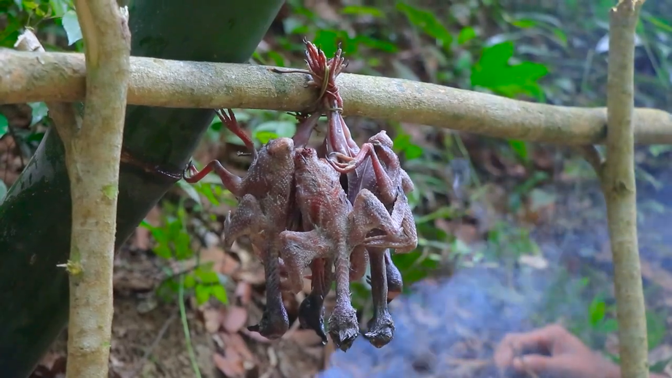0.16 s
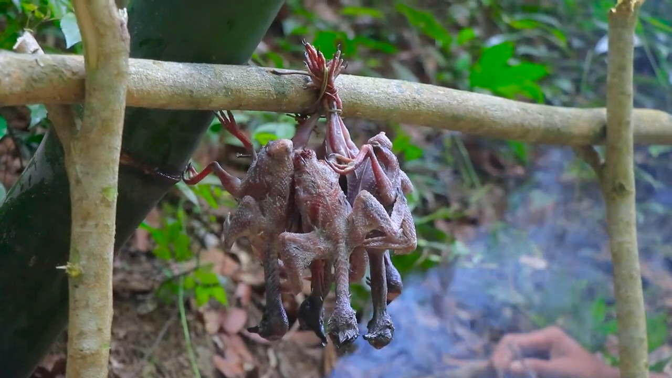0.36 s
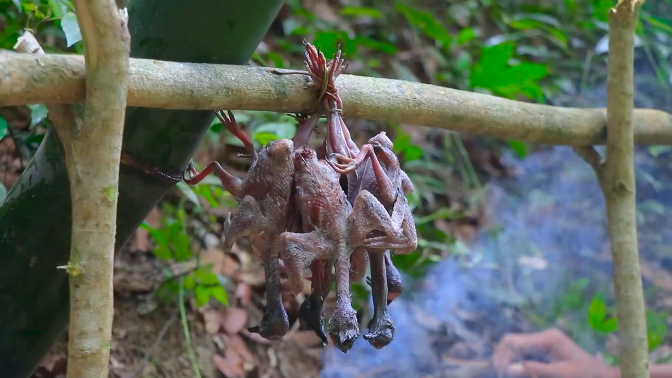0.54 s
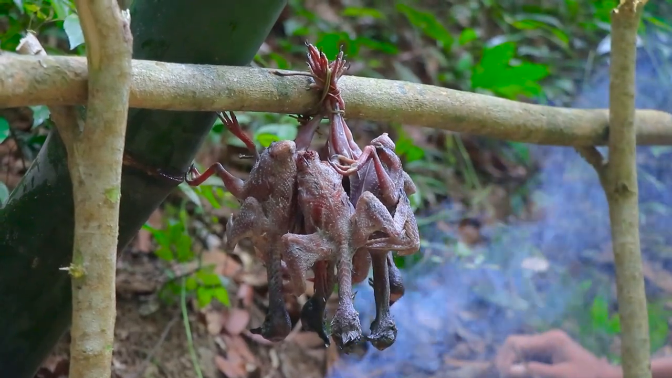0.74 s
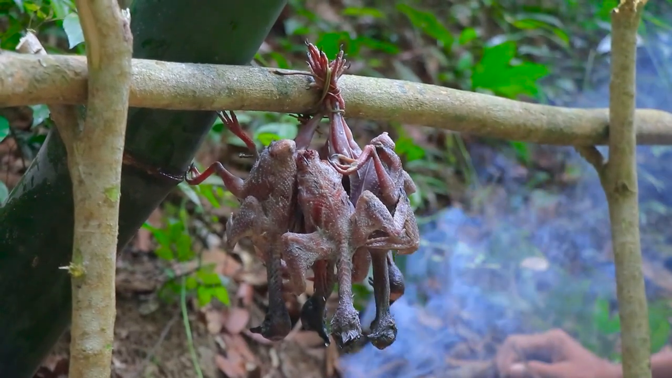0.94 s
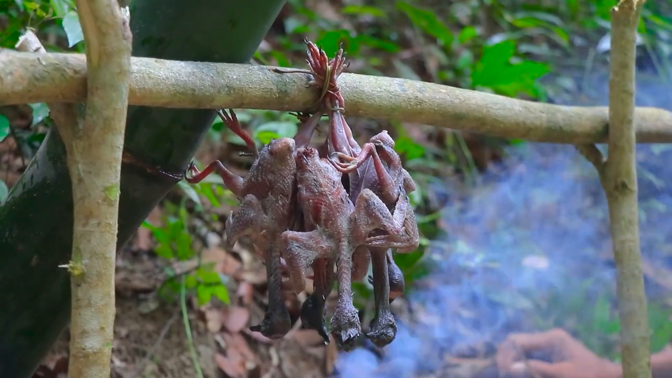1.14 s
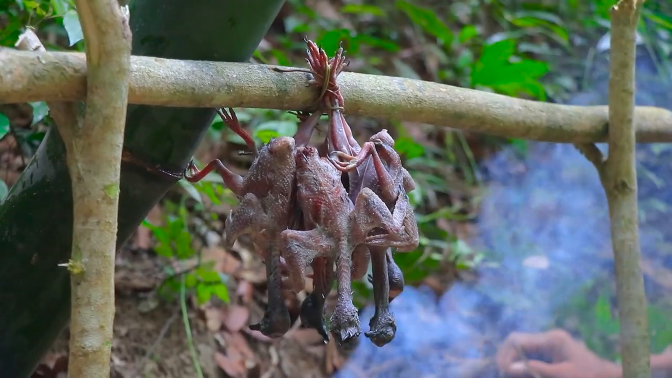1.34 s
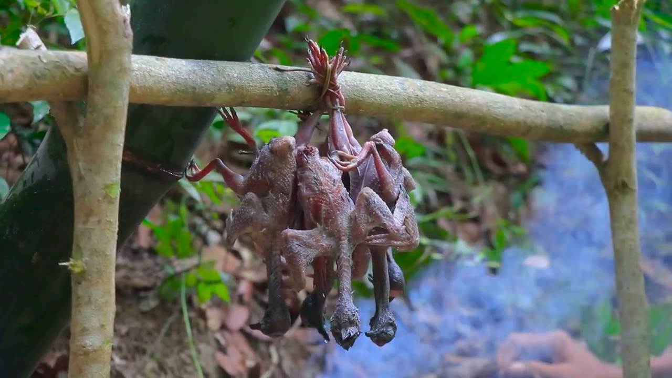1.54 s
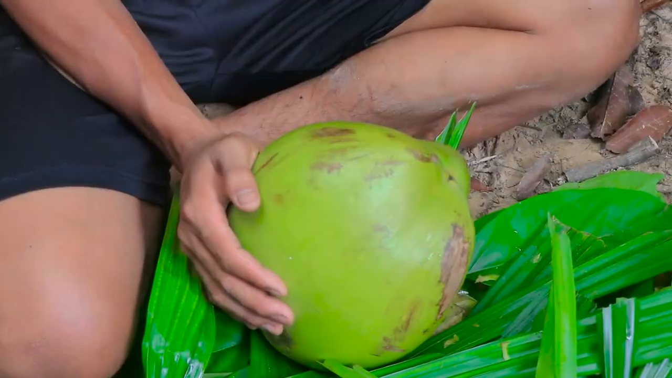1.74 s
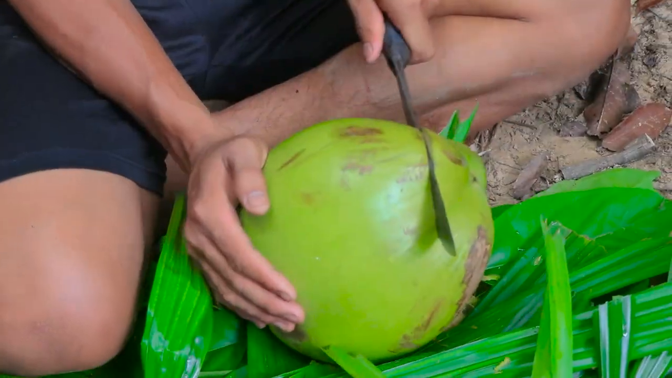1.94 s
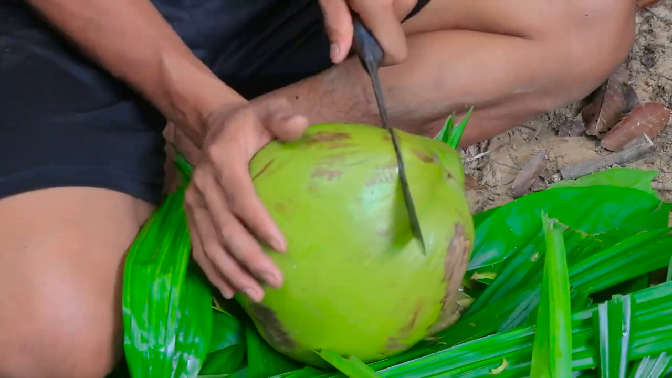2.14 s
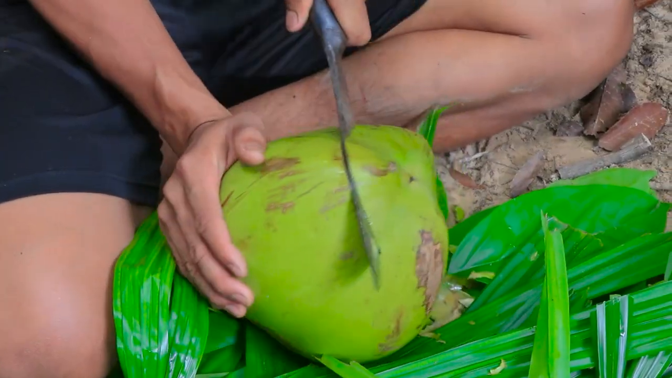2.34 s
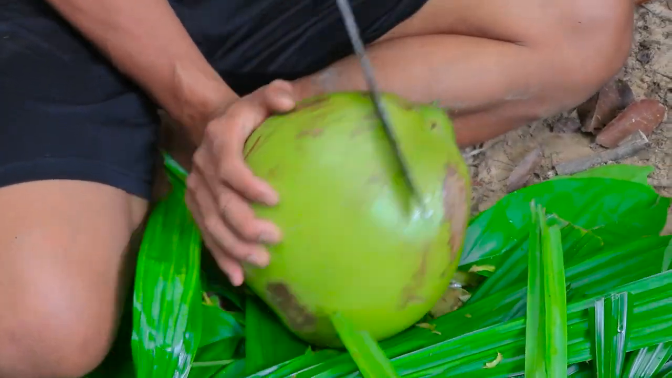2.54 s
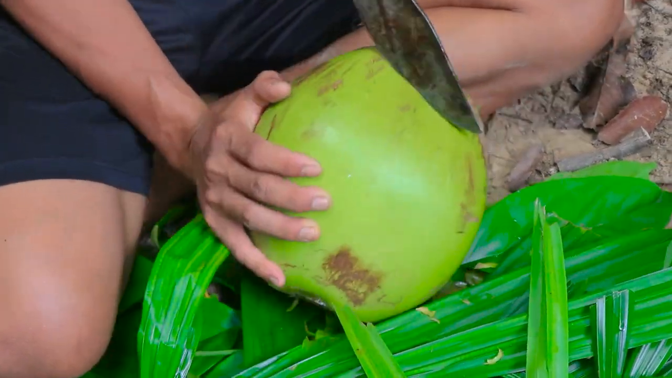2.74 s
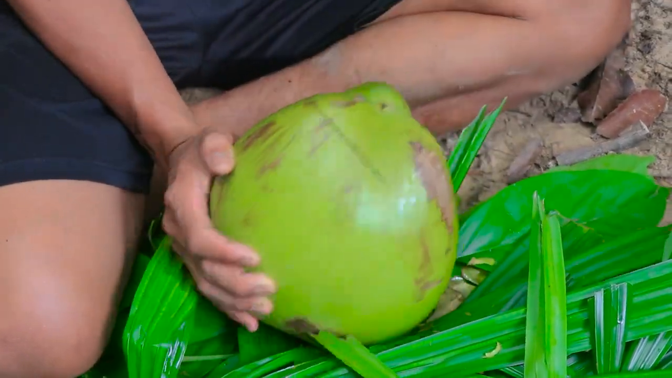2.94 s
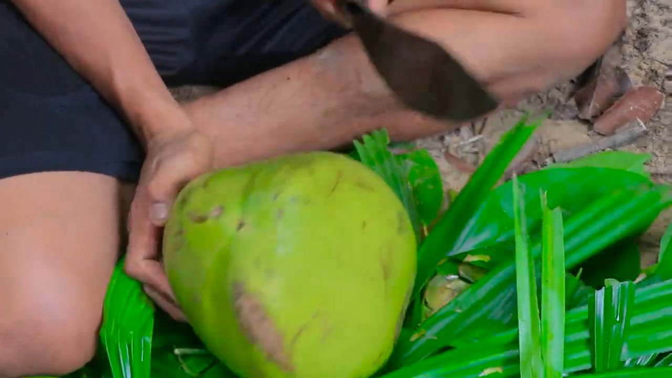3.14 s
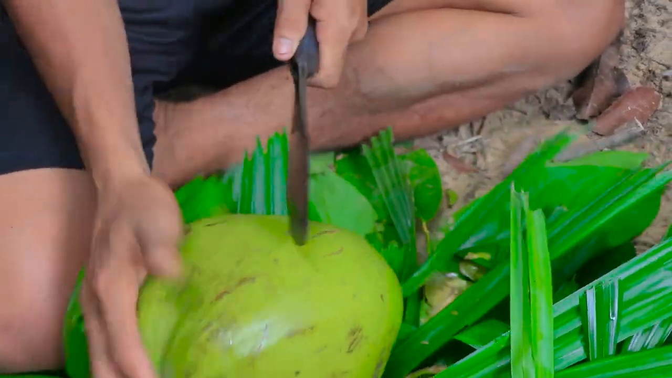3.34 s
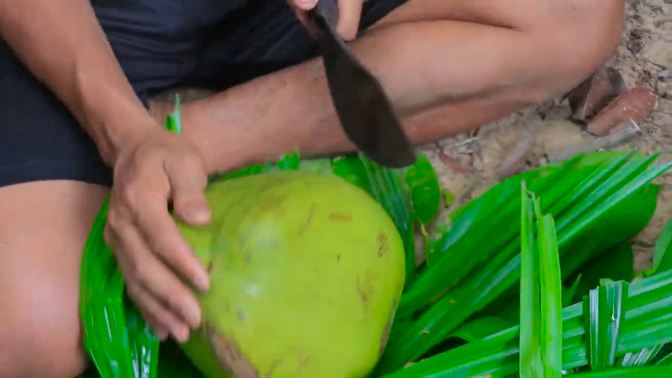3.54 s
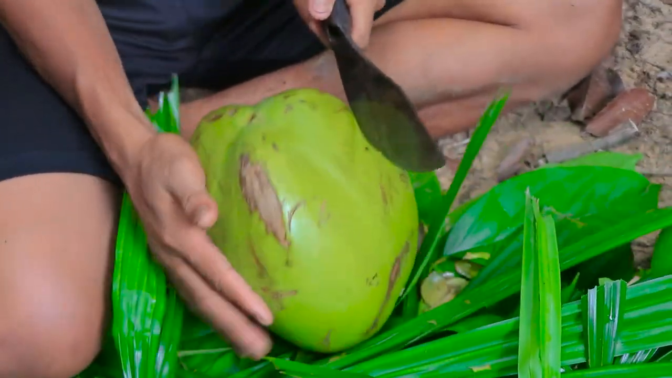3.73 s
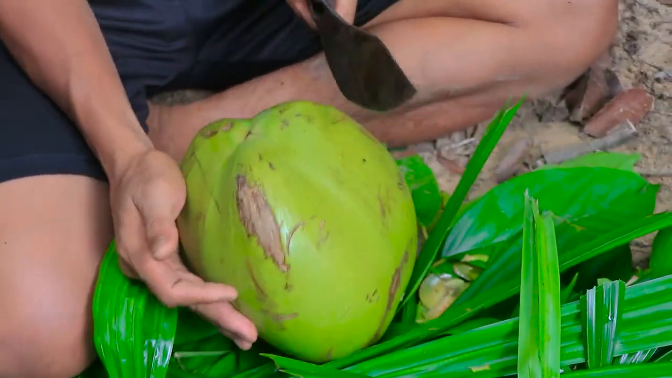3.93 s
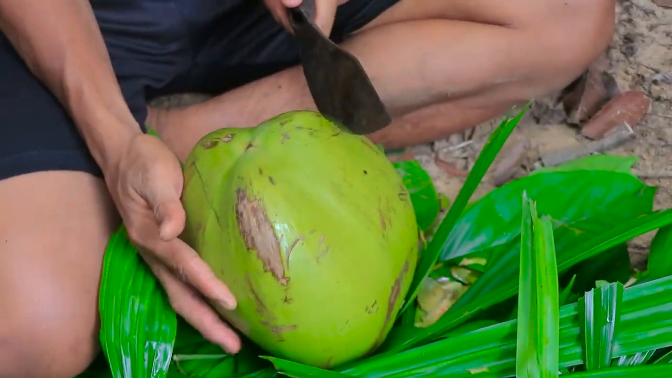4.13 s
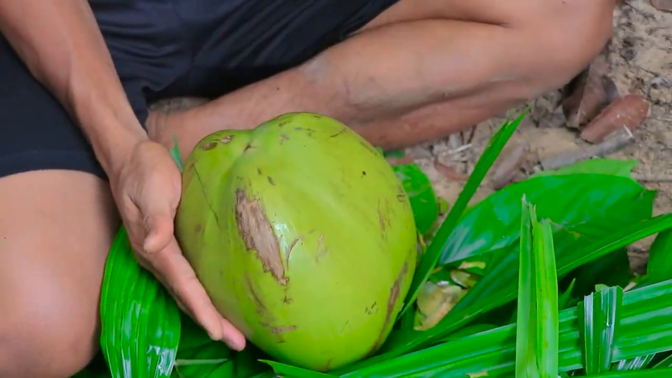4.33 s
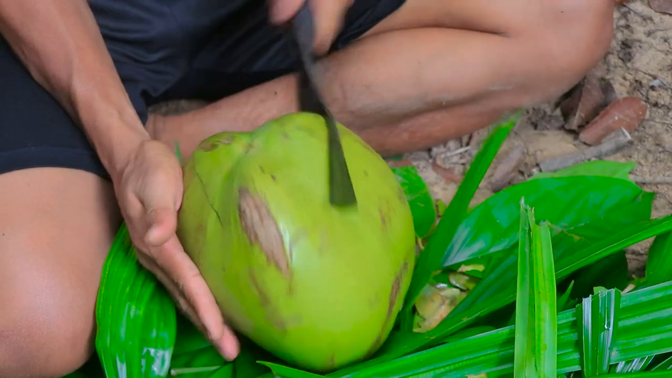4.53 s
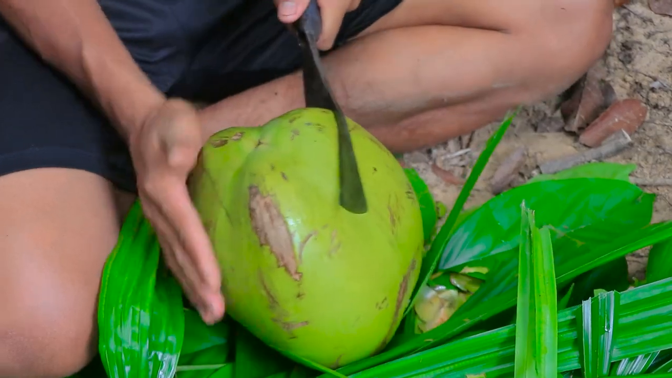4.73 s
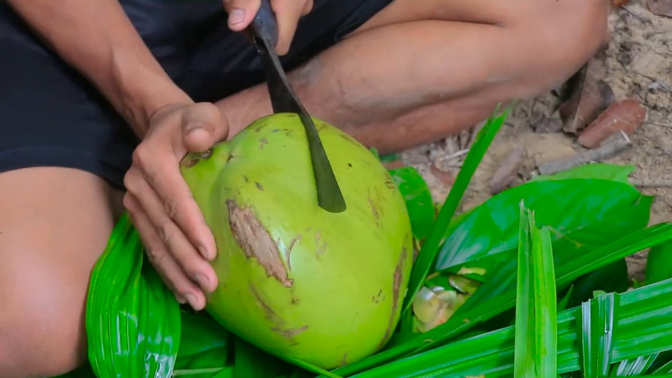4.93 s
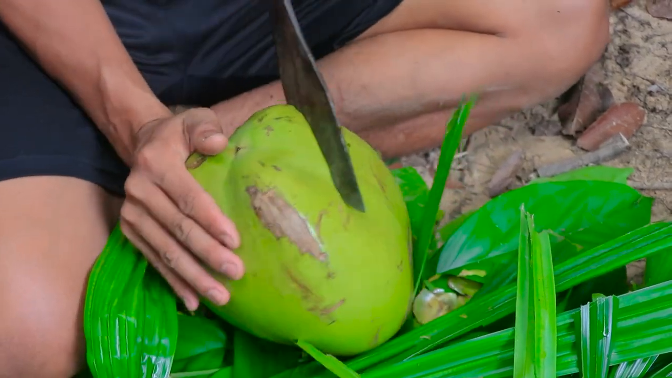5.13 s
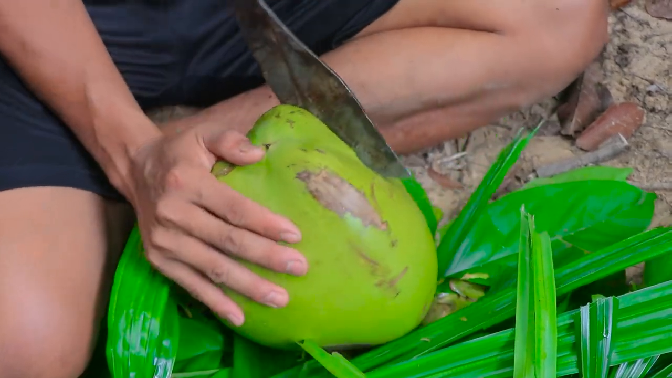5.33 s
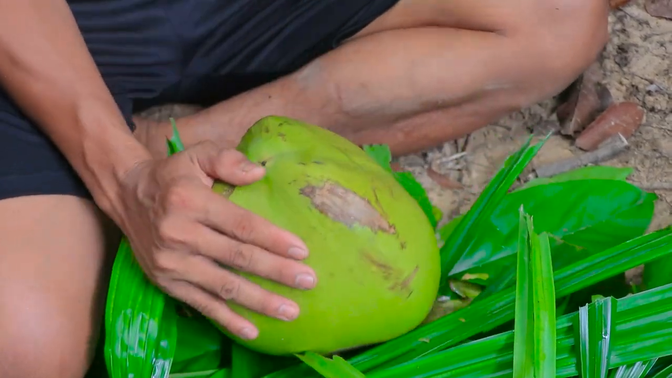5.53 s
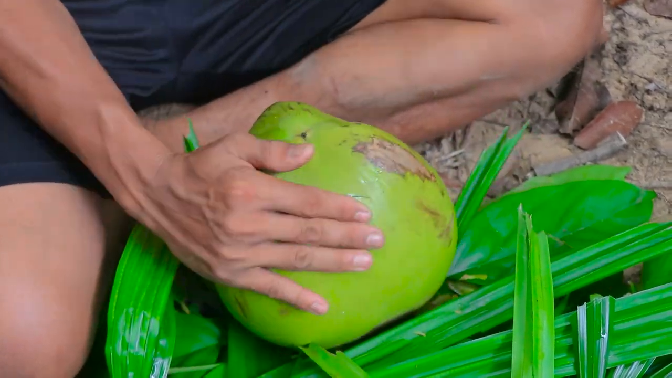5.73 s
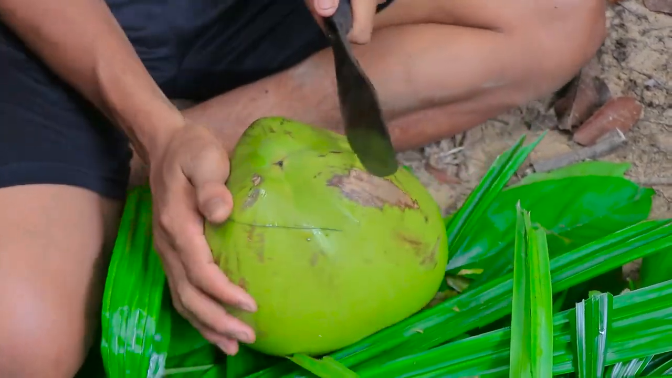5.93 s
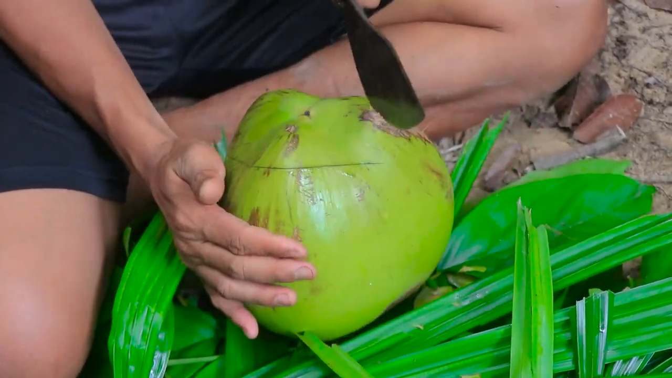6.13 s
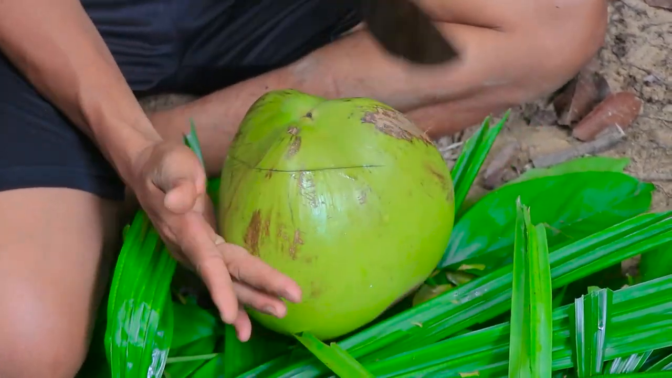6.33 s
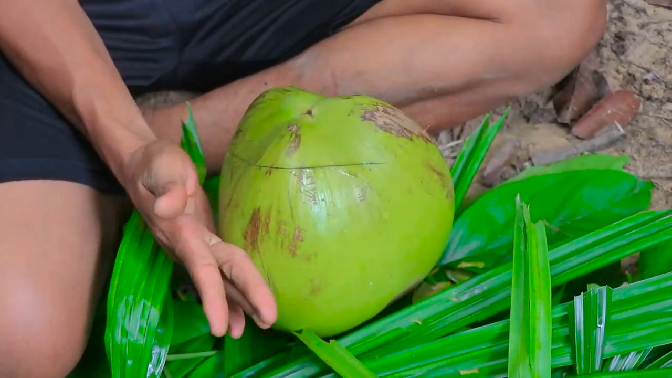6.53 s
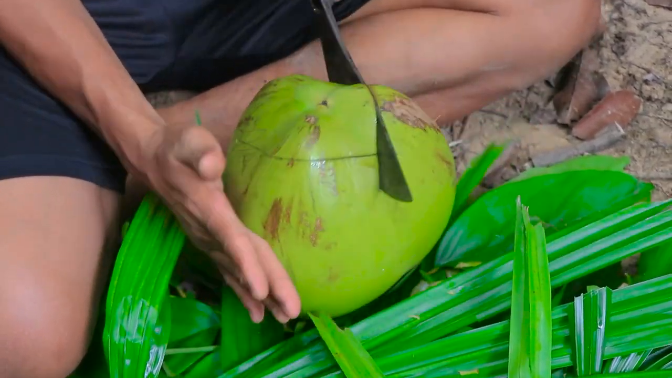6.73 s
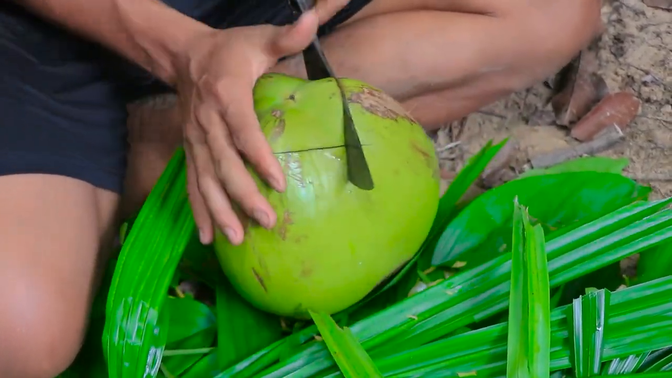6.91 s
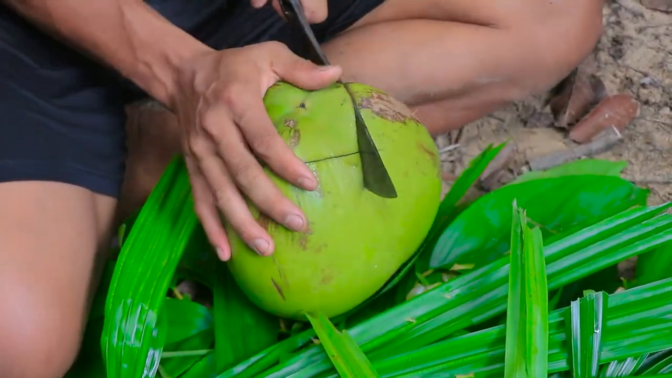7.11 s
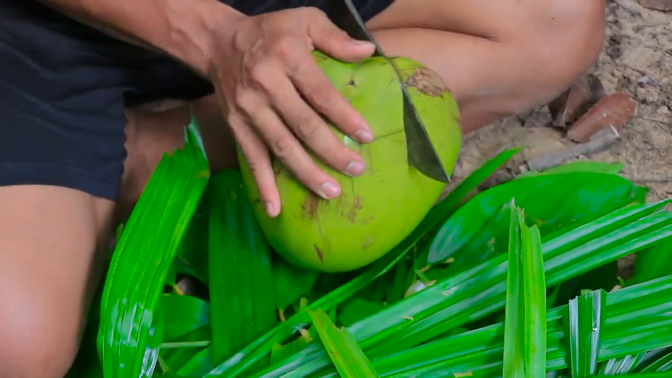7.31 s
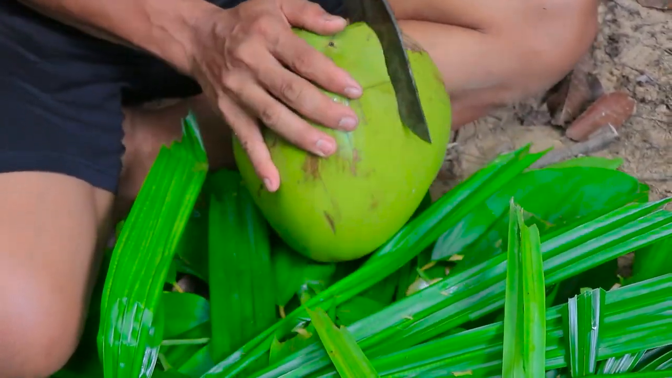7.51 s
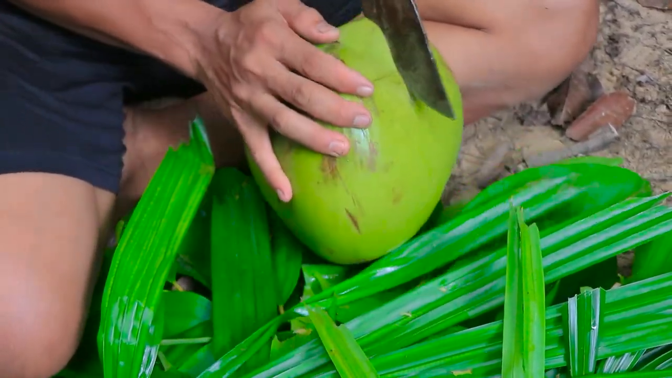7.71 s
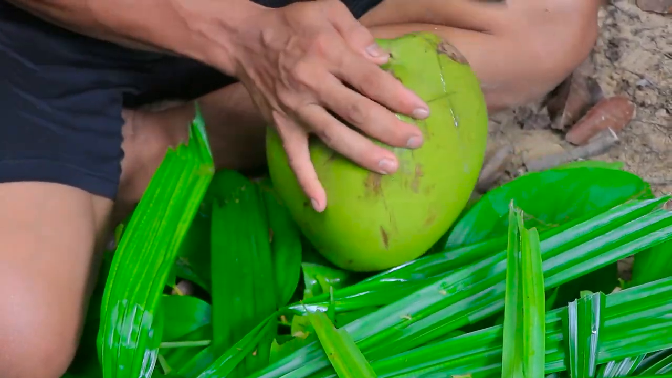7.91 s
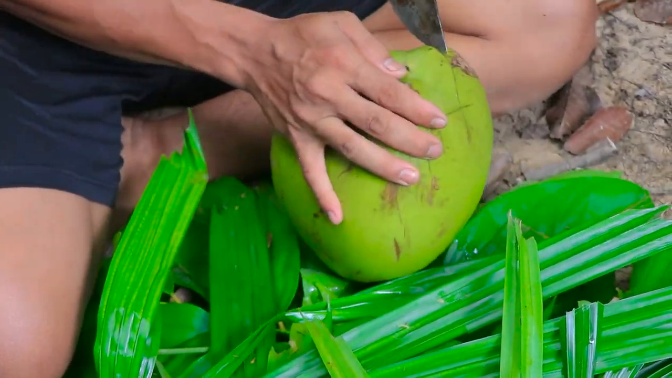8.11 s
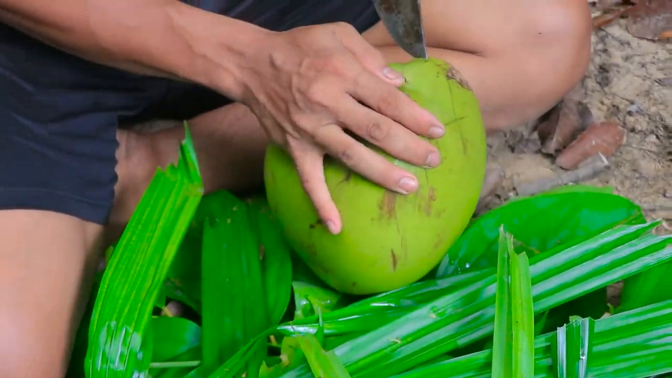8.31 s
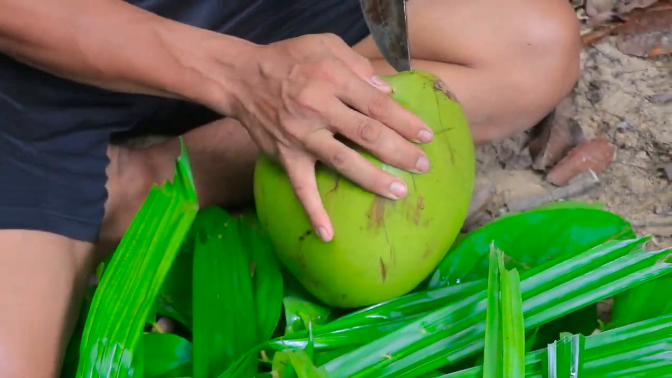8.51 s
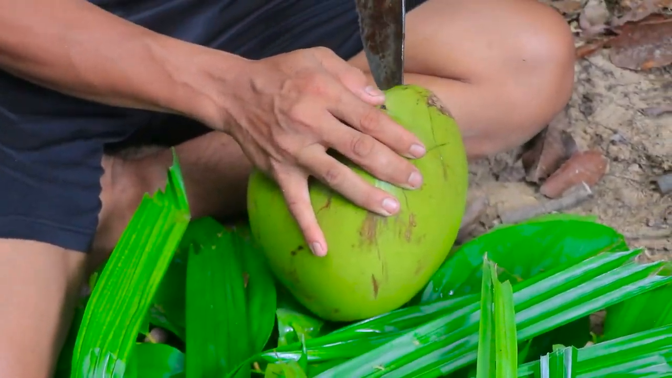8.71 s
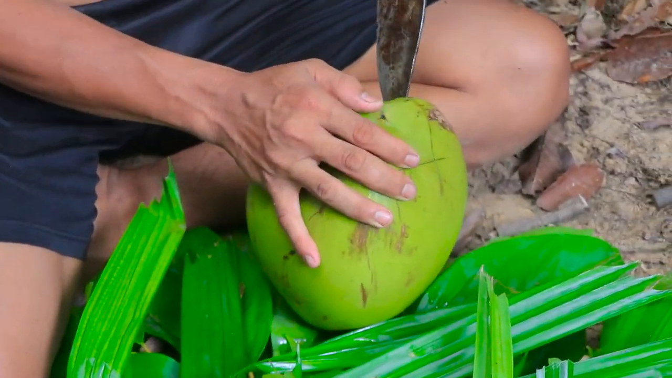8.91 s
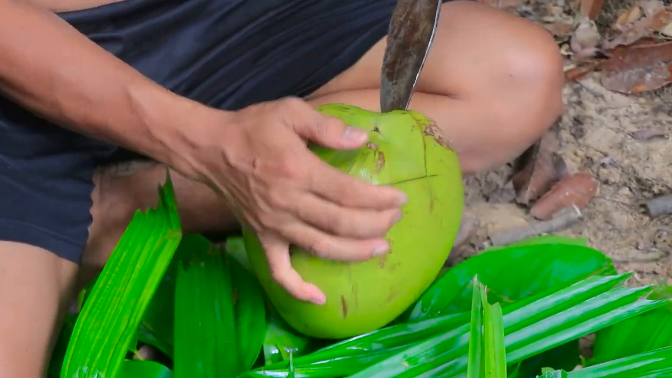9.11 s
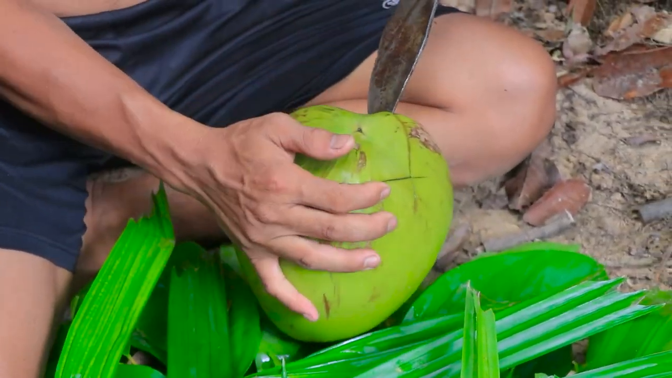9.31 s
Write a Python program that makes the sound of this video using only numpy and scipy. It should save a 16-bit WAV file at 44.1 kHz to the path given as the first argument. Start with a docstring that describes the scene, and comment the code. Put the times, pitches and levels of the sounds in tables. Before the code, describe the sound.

Close outdoor stereo pickup, little echo. First, soft leaf rustling, a single wooden tap and short pure bird notes over faint rumble and hiss. Then sharp clicks at right, and a knife chopping a water-filled coconut. Three loud fibrous cracks are spaced a few seconds apart, with gritty prying, brief squeaks, dull hollow knocks and leafy rustling as the nut is turned.

```python
"""Green coconut at a forest camp

Beside a smoking fire dry leaves rustle, wood taps once and a bird whistles over the forest's hum and hiss.
Then, on a bed of palm leaves, a long knife chops three times into a green coconut.
After each chop the blade is worked out of the wet husk, and the nut is rolled over on the leaves.
Contacts are noise bursts with decaying sines; friction is trains of random clicks, filtered and swelled.
"""
import sys
import numpy as np
from scipy import signal
from scipy.fft import rfft, irfft, next_fast_len
from scipy.io import wavfile

SR = 44100
rng = np.random.default_rng(int(sys.argv[2]) if len(sys.argv) > 2 else 0)


def store_pcm(level_fs):
    """Save levels as 16-bit WAV."""
    pcm = np.round(np.clip(level_fs, -1, 1) * 32767).astype(np.int16)
    wavfile.write(sys.argv[1], SR, np.atleast_2d(pcm).T)


N = 412776
T = np.arange(N) / SR

SCENE_CHANGE_S = 1.675  # the fireside gives way to the work on the nut
CAMP_AIR_DB, FOREST_AIR_DB = -46, -49.5
RESTING_DB = -60  # the held nut never lies quite still
CUTOFF_HZ = 15900
# Movements: rise before the start and 60 dB fall after the end, in seconds.
STROKE_ATTACK_S, STROKE_RELEASE_S = 0.012, 0.061
SHOVE_ATTACK_S, SHOVE_RELEASE_S = 0.041, 0.33
STIR_ATTACK_S, STIR_RELEASE_S = 0.046, 0.17
NOTE_ATTACK_S, NOTE_RELEASE_S, NOTE_GLIDE_S = 0.0123, 0.062, 0.0273

# Background air. Each row: frequency in Hz, relative level in dB.
CAMP_AIR_SPECTRUM = [(20, -24), (45, 3), (60, 2), (85, 0.5), (125, -5), (200, -9), (310, -12), (440, -10.5),
                     (890, -17.5), (2200, -23), (4200, -25.5), (6000, -34), (9000, -26.5), (13600, -17),
                     (16000, -20.5)]
FOREST_AIR_SPECTRUM = [(20, -6), (45, -4.5), (65, -3), (84, 0), (105, -8), (160, -8.5), (280, -11),
                       (440, -10), (750, -15), (1500, -16), (3800, -23), (5800, -30.5), (10500, -23.5),
                       (16000, -34)]
# A faint far hum at the camp. Each row: frequency in Hz, level in dB.
CAMP_HUM = [(99.8, -52), (150, -61.5)]

# Dry leaves stirred by the fire. Each row: start in seconds, length in seconds, crunch level in dB,
# swell over the movement in dB, crisp hiss relative to the crunch in dB.
LEAF_STIRS = [(0, 0.38, -59.5, -1, 0), (.31, 0.057, -38, 1, 3.5), (.41, 0.18, -53, -2, 3.5),
              (.6, 0.061, -49, 5, 4), (.69, 0.17, -55, -8, -1.5), (.865, 0.036, -42, 2.5, 0.5),
              (.93, 0.023, -47, -1, 1), (.992, 0.019, -44, -3, -2.5), (1.04, 0.39, -57, 1, 2)]
# Bird notes. Each row: start in seconds, length in seconds, start pitch in Hz, end pitch in Hz,
# level in dB, swell over the note in dB, throb depth from 0 to 1.
BIRD_NOTES = [(.005, 0.035, 985, 993, -36, -1, 0.02), (.165, .045, 1277, 1153, -38, -8, 0.32),
              (.215, 0.17, 1152, 1144, -45, -5, 0.35), (1.674, 0.051, 1166, 1125, -45, 2, 0.34)]
# Close clicks on the right. Each row: start in seconds, click level in dB, click centre in Hz,
# thud level in dB.
RIGHT_CLICKS = [(1.7401, -9, 1280, -7), (1.7543, -16, 1400, -32), (1.775, -14.5, 3800, -17),
                (1.782, -14, 550, -27), (1.79, -4.5, 11100, -22)]

# The nut shoved over the palm leaves. Each row: start in seconds, length in seconds, rubbing level in dB,
# swell over the movement in dB, shell relative to the rubbing in dB, leaf hiss relative to it in dB.
NUT_SHOVES = [(1.845, 0.061, -45, 7, -4, 3), (1.93, 0.25, -48.5, -11.5, 1, -2.5),
              (2.335, 0.072, -42, -0.5, -1.5, 0.5), (2.46, 0.049, -46, -1, -2.5, -12),
              (2.64, 0.14, -40.5, 1, -5, -4.5), (2.83, 0.093, -40.5, 4.5, -0.5, -6),
              (2.97, .18, -40, 6, -5, -3), (3.17, .19, -33.5, 6.5, -3.5, -4),
              (3.38, 0.12, -37.5, -5, -5, -3), (3.53, 0.28, -40, -2, 0.5, -2),
              (3.84, 0.2, -46.5, 8, -8, -2.5), (4.15, 0.0097, -47, -11, -5, 1.5),
              (4.52, 0.027, -53, 2, -10, -3), (4.63, 0.073, -44, -2, -5, -1.5),
              (4.815, 0.021, -49, 0, -12, -1.5), (5.25, 0.059, -48.5, 3, -11, -3),
              (5.33, 0.11, -45.5, -4, -18, 2), (5.5, 0.081, -51, 0, -3, -5),
              (5.69, 0.075, -47.5, -0.5, -13, 1), (5.905, 0.02, -42, 6, -5, -3),
              (6.04, 0.16, -49.5, 1.5, -5, -1), (6.37, 0.037, -54, 0, -8, 1),
              (6.71, 0.055, -45.5, 6, -3, -2), (6.91, .15, -50, -6, -7, -1.5),
              (7.19, 0.14, -42, 4.5, -8.5, -0.5), (7.44, 0.28, -45, -3, 1, -2),
              (7.83, 0.13, -43, 4, 0.5, 1), (8.0, 0.12, -45, -3, -1.5, -0.5),
              (8.18, 0.27, -48.5, -0.5, -4, 0), (8.5, 0.18, -55, 8, -8, -5), (8.92, 0.025, -55, -2, -12, 1),
              (9.05, 0.14, -51, 1.5, -5, -5.5), (9.2, 0.18, -49.5, -8, -3, -3.5)]
# Short ringing ticks: ribs and fibres snapping, and one wooden tap by the fire.
# Each row: start in seconds, level in dB, centre in Hz.
RINGING_TICKS = [(0.218, -35.5, 10500), (0.2618, -28, 1080), (.383, -30, 8100), (.905, -34, 4500),
                 (0.989, -37, 2470), (1.035, -35, 4000), (1.299, -37, 9000), (1.423, -35, 8500),
                 (2.124, -27, 1700), (2.561, -20, 1490), (2.899, -25.5, 1560), (2.873, -29, 1600),
                 (3.297, -22.5, 1600), (3.4067, -24, 2900), (3.437, -12, 3830), (3.784, -24.5, 2180),
                 (4.147, -36, 2560), (5.319, -24.5, 3870), (5.399, -34, 4000), (5.427, -25, 3120),
                 (5.639, -37, 2550), (6.176, -40.5, 4000), (6.754, -31, 3030), (6.984, -36, 4000),
                 (7.409, -18, 2640), (7.784, -38, 3260), (7.930, -35, 3040), (8.071, -30.5, 3320),
                 (8.281, -24, 2880), (8.561, -31, 1820)]
# Dull knocks on the nut. Each row: start in seconds, clack level in dB, clack pitch in Hz,
# thump level in dB, shell pitch in Hz, time the shell is driven in seconds.
NUT_KNOCKS = [(1.888, -17, 900, -16, 394, 0.025), (2.231, -31.5, 1440, -28.5, 343, 0.0054),
              (2.246, -48, 1310, -28.5, 215, 0.0085), (2.277, -28, 1370, -37, 302, 0.015),
              (3.168, -30, 1370, -29.5, 456, 0.017), (3.318, -47, 1300, -22, 440, .006),
              (3.342, -25, 1480, -24, 354, 0.0053), (3.438, -23.5, 1505, -22, 475, 0.0016),
              (3.479, -49, 1400, -31, 420, 0.004), (3.592, -19.5, 1095, -32, 434, 0.016),
              (3.6397, -28, 880, -24.5, 440, 0.0032), (3.683, -24, 1040, -27, 450, 0.017),
              (3.720, -37, 895, -31.5, 450, 0.016), (3.759, -38, 1230, -32, 396, 0.014),
              (4.03, -35, 780, -27.5, 402, 0.0081), (4.034, -48, 760, -35.5, 251, 0.019),
              (5.905, -42, 1500, -37, 367, 0.0036), (5.932, -31, 1316, -43, 420, 0.0036),
              (6.205, -57, 1490, -35, 334, 0.0033), (7.391, -28.5, 1430, -34, 375, 0.01),
              (7.419, -23, 950, -28, 365, 0.031), (8.179, -37, 1400, -38, 392, 0.012)]
# The blade levered through the husk. Each row: start in seconds, length in seconds, husk level in dB,
# swell over the stroke in dB, shell relative to the husk in dB, fibres relative to it in dB.
BLADE_STROKES = [(2.236, 0.039, -45.5, 3, 6, -1.5), (2.278, 0.032, -44.5, -5.5, 6, 4),
                 (2.502, 0.07, -31.5, -7, -10, 1.5), (2.577, 0.079, -42, -9.5, -4.5, 5),
                 (2.79, 0.025, -30.5, 8, -1.5, 3), (5.031, .013, -30, -3, -1.5, -1.5),
                 (5.058, 0.11, -29.5, 5, -9, 2.5), (5.172, 0.04, -31.5, 1.5, -11, 0.5),
                 (5.463, 0.03, -30.5, -4, -8.5, 5), (7.39, 0.036, -32.5, 4, -3, -3.5),
                 (7.432, 0.084, -37.5, -1, -3.5, 2), (7.53, 0.029, -33, 4, -13, 2),
                 (7.566, 0.12, -40.5, -1, -10, 4), (7.749, 0.017, -31.5, -1.5, -13, -5),
                 (7.786, 0.0082, -41, 1, -7, 16.5)]
# The blade squeaking in the husk. Each row: start in seconds, length in seconds, start pitch in Hz,
# end pitch in Hz, level in dB.
BLADE_SQUEAKS = [(2.486, 0.027, 537, 1340, -32), (2.751, 0.049, 1425, 1263, -34.5),
                 (2.796, 0.028, 1120, 1370, -41), (5.147, 0.022, 1347, 1416, -24.5),
                 (5.454, 0.014, 1310, 1700, -25.5), (5.466, 0.019, 1530, 1700, -23),
                 (7.534, 0.038, 483, 499, -29.5), (7.666, 0.019, 1010, 900, -33.5),
                 (7.745, 0.023, 1570, 1560, -38)]
# Strength of a squeak's partials. Each row: frequency in Hz, relative level in dB.
SQUEAK_SPECTRUM = [(450, 5), (750, 6), (1000, -2), (1500, 3.5), (2000, -6), (2700, -5), (3300, -5.5),
                   (4200, -18), (5500, -12), (7000, -17), (14000, -22)]
# The blade slipping free and ringing. Each row: start in seconds, level in dB.
BLADE_RELEASES = [(2.82, -44), (5.497, -42)]
# Ringing modes of the blade. Each row: frequency in Hz, relative level in dB, 60 dB decay in seconds.
BLADE_MODES = [(2630, -6, .15), (3400, 4.5, .2), (10900, 6, 0.08), (13600, -4, .15)]
# Chops. Each row: start in seconds, crack level in dB, cutting time in seconds, thump level in dB,
# thump delay in seconds, shell pitch in Hz, time the shell is driven in seconds.
KNIFE_CHOPS = [(1.912, -11.5, 0.004, -6.5, 0.0057, 414, 0.0024),
               (4.5981, -10.5, 0.0025, -24.5, 0.00545, 370, 0.011),
               (6.6780, -9, 0.0011, -9.5, 0.00494, 420, 0.0048)]
# Resonances of the husk round the blade. Each row: frequency in Hz, width in Hz, relative level in dB.
HUSK_MODES = [(964, 280, -7.5), (1433, 140, 10.5), (1590, 410, -4), (2084, 40, 2)]

# Spectra of the nut, husk and leaves. Each row: frequency in Hz, relative level in dB.
SHELL_SPECTRUM = [(120, -20.5), (250, -10), (340, -5), (440, 2), (540, -3.5), (700, -7), (1000, -12),
                  (1600, -82)]
FIBRE_SPECTRUM = [(700, -36), (1600, -2), (2400, 3.5), (3400, 1), (4800, -3.5), (5900, -9.5), (7500, -5.5),
                  (9000, -4.5), (12000, -7.5), (14000, -12), (16000, -26)]
RUB_SPECTRUM = [(400, -14), (800, -42.5), (1100, -4), (1480, 3.5), (1900, 0), (2600, 0), (3400, 1),
                (4700, -2.5), (5800, -11), (8000, -68)]
LEAF_HISS_SPECTRUM = [(3000, -20), (5700, -6), (7500, 1), (9000, 2.5), (11000, 3.5), (13500, -2.5),
                      (16000, -10.5)]
CRACK_SPECTRUM = [(150, -47), (300, -39), (450, -13), (600, 7), (950, 2), (1430, 1.5), (2000, -0.5),
                  (3300, 1), (4500, -4), (5700, -9), (7200, -6.5), (10000, -3), (13000, -7.5), (16000, -15)]

# Likeness of left and right for close work, leaves and air. Each row: frequency in Hz, likeness from 0 to 1.
NEAR_LIKENESS = [(400, 0.98), (1400, 0.88), (3200, 0.62), (6000, 0.62), (12000, 0.4)]
LEAFY_LIKENESS = [(400, 0.99), (1400, 0.8), (3200, 0.38), (6000, 0.033), (12000, 0.081)]
DIFFUSE_LIKENESS = [(60, 0.98), (150, 0.77), (450, 0.31), (1400, 0.055), (4000, 0.017), (12000, .02)]
# Stereo lean of the coloured textures. Each row: frequency in Hz, left minus right in dB.
STEREO_LEAN = [(100, -.5), (450, -0.1), (1400, -1.5), (3200, -2.5), (6000, -3.5), (11000, -4)]


def from_db(db):
    """Decibels to gain."""
    return 10 ** (np.asarray(db) / 20)


def rms_one(x):
    """Scale so that the centre of the stereo image has rms 1."""
    centre = np.atleast_2d(x).mean(axis=0)
    return x / np.sqrt(np.mean(centre ** 2) + 1e-20)


def at_hz(points, hz):
    """Read a table on a log-frequency axis."""
    table_hz, value = np.transpose(points)
    return np.interp(np.log(hz + 1e-9), np.log(table_hz), value)


def add(out, start_s, sound):
    """Mix a short sound in at its start time."""
    at = int(start_s * SR)
    out[..., at:at + sound.shape[-1]] += sound[..., :N - at]


def sine(hz, t):
    """A steady sine starting at phase zero."""
    return np.sin(2 * np.pi * hz * t)


def flutter(rate, depth_db):
    """A gain that wanders at random between new values, rate times a second."""
    knots = rng.standard_normal(N // 20)
    return from_db(depth_db * np.interp(T * rate, np.arange(len(knots)), knots))


def grains(per_s, spread_db):
    """Two trains of random clicks, a few of them much larger than the rest."""
    sizes = from_db(spread_db * np.minimum(rng.exponential(1, (2, N)), 4.5))
    signs = rng.choice([-1, 1], (2, N))
    fires = rng.random((2, N)) < per_s / SR
    return sizes * signs * fires


def colour(pair, spectrum, likeness):
    """Turn two unrelated signals into a stereo texture with this spectrum; rms 1."""
    length = pair.shape[-1]
    size = next_fast_len(length, real=True)
    hz = np.arange(size // 2 + 1) * SR / size
    mid, side = rfft(pair, size) * from_db(at_hz(spectrum, hz))
    alike = np.clip(at_hz(likeness, hz), 0, 1)
    signs = np.array([[1], [-1]])  # left, right
    both = np.sqrt(1 + alike) * mid + np.sqrt(1 - alike) * side * signs
    both = both * from_db(signs * at_hz(STEREO_LEAN, hz) / 2)
    return rms_one(irfft(both, size)[:, :length])


def resonate(x, hz, width_hz):
    """One resonance with gain 1 on top."""
    r = np.exp(-np.pi * width_hz / SR)
    zeros = np.array([1, 0, -1]) * (1 - r * r) / 2
    poles = [1, -2 * r * np.cos(2 * np.pi * hz / SR), r * r]
    return signal.lfilter(zeros, poles, x)


def burst(t, hold_s, t60):
    """An envelope that stays up for hold_s, then falls 60 dB in t60 seconds."""
    return from_db(-60 * np.maximum(t - hold_s, 0) / t60)


def gesture(start_s, length_s, swell_db, attack_s, release_s):
    """One movement: it rises up to its start, swells or sags evenly, then falls 60 dB in release_s."""
    out = np.zeros(N)
    first = max(int((start_s - attack_s) * SR), 0)
    span = slice(first, int((start_s + length_s + release_s) * SR))
    t = T[span] - start_s
    rise = np.clip(1 + t / attack_s, 0, 1)
    swell = from_db(swell_db * (np.clip(t / length_s, 0, 1) - 0.5))
    out[span] = rise * swell * burst(t, length_s, release_s)
    return out


def movements(rows, attack_s, release_s):
    """One gain curve for each layer of a movement table; where movements overlap the louder one wins."""
    out = np.zeros((len(rows[0]) - 3, N))
    for start_s, length_s, db, swell_db, *layers_db in rows:
        level = gesture(start_s, length_s, swell_db, attack_s, release_s)
        on = np.flatnonzero(level)
        layer_gains = from_db(db + np.array([0, *layers_db]))
        out[:, on] = np.maximum(out[:, on], np.outer(layer_gains, level[on]))
    return out


def air(drone_hz=83, drone_width_hz=7, drone_db=-58):
    """Shaped noise for far rumble and high hiss, with a hum by the fire and a low drone after it."""
    at_fire = np.clip((SCENE_CHANGE_S - T) / 0.02 + 0.5, 0, 1)  # 20 ms crossfade
    camp_noise = rng.standard_normal((2, N))
    camp = from_db(CAMP_AIR_DB) * colour(camp_noise, CAMP_AIR_SPECTRUM, DIFFUSE_LIKENESS)
    hum = sum(np.sqrt(2) * from_db(db) * sine(hz, T) for hz, db in CAMP_HUM)
    hum = hum * flutter(rate=5.1, depth_db=-1.0)
    forest_noise = rng.standard_normal((2, N))
    forest = from_db(FOREST_AIR_DB) * colour(forest_noise, FOREST_AIR_SPECTRUM, DIFFUSE_LIKENESS)
    drone = from_db(drone_db) * rms_one(resonate(rng.standard_normal(N), drone_hz, drone_width_hz))
    return np.sqrt(at_fire) * (camp + hum) + np.sqrt(1 - at_fire) * (forest + drone)


def dry_leaves(pan_db=-0.5):
    """Stirred leaf litter breaks in dense random clicks: a crunch and a crisp hiss, a touch to the right."""
    crunch_gain, hiss_gain = movements(LEAF_STIRS, STIR_ATTACK_S, STIR_RELEASE_S)
    crackle = grains(per_s=6000, spread_db=3.0) * flutter(rate=100, depth_db=2.5)
    crunch = colour(crackle, RUB_SPECTRUM, DIFFUSE_LIKENESS)
    crunch = crunch + from_db(-6) * colour(crackle, SHELL_SPECTRUM, LEAFY_LIKENESS)  # adds low body
    hiss = colour(crackle, LEAF_HISS_SPECTRUM, DIFFUSE_LIKENESS)
    return (crunch_gain * crunch + hiss_gain * hiss) * from_db([[pan_db / 2], [-pan_db / 2]])


def bird(overtone_db=-27, throb_hz=55, waver_db=1.4):
    """Nearly pure whistles with a faint octave; each settles on its end pitch, throbbing and wavering."""
    out = np.zeros(N)
    waver = flutter(rate=200, depth_db=waver_db) - 1
    for start_s, length_s, start_hz, end_hz, db, swell_db, depth in BIRD_NOTES:
        since_onset = np.maximum(T - start_s + NOTE_ATTACK_S, 0)
        hz = end_hz + (start_hz - end_hz) * np.exp(-since_onset / NOTE_GLIDE_S)
        phase = 2 * np.pi * np.cumsum(hz * (1 + depth * waver)) / SR
        throb = 1 + depth * np.cos(2 * np.pi * throb_hz * (T - start_s))
        note = gesture(start_s, length_s, swell_db, NOTE_ATTACK_S, NOTE_RELEASE_S)
        whistle = np.sin(phase) + from_db(overtone_db) * np.sin(2 * phase)
        out += np.sqrt(2) * from_db(db) * note * throb * whistle
    return out * from_db([[-1], [0.8]])


def right_clicks(width_share=0.71, click_t60=0.0076, thud_hz=125, thud_t60=0.012):
    """Short resonant noise clicks, each with a low decaying thud, almost wholly on the right."""
    out, t = np.zeros(N), T[:SR // 10]
    for start_s, click_db, click_hz, thud_db in RIGHT_CLICKS:
        click = rms_one(resonate(rng.standard_normal(len(t)), click_hz, width_share * click_hz))
        thud = -np.cos(2 * np.pi * thud_hz * t) * burst(t, 0, thud_t60)
        add(out, start_s, from_db(click_db) * click * burst(t, 0, click_t60))
        add(out, start_s, from_db(thud_db) * thud)
    return out * from_db([[-30], [0]])


def crackles(per_s=110, spread_db=3.5, low_hz=900, high_hz=11000, width_share=0.14, count=12):
    """Loose snaps of leaf ribs, dealt at random to resonances from low to high; rms 1."""
    clicks = grains(per_s, spread_db)
    dealt = rng.integers(0, count, N)
    ticks = np.zeros((2, N))
    for k, hz in enumerate(np.geomspace(low_hz, high_hz, count)):
        ticks += resonate(clicks * (dealt == k) + 1e-18, hz, width_share * hz) / np.sqrt(hz)
    return rms_one(ticks + 0.5 * ticks[::-1])  # half of each side leaks to the other


def rolling(crackle_db=-7):
    """The smooth skin rubs over the leaves, which crackle and hiss; the hollow nut rumbles along."""
    resting = from_db(RESTING_DB) * (T > SCENE_CHANGE_S)
    gains = np.maximum(movements(NUT_SHOVES, SHOVE_ATTACK_S, SHOVE_RELEASE_S), resting)
    rub_gain, shell_gain, hiss_gain = gains
    friction = grains(per_s=6000, spread_db=3.0) * flutter(rate=110, depth_db=2.2)
    rub = from_db(-0.42) * colour(friction, RUB_SPECTRUM, LEAFY_LIKENESS) * flutter(rate=54, depth_db=1.35)
    rub = rub + from_db(crackle_db) * crackles()
    rumble = from_db(-1.25) * colour(friction, SHELL_SPECTRUM, LEAFY_LIKENESS)
    rumble = rumble * flutter(rate=40, depth_db=2.5)
    brushing = grains(per_s=12000, spread_db=2.6) * flutter(rate=110, depth_db=2.7)
    hiss = from_db(-0.86) * colour(brushing, LEAF_HISS_SPECTRUM, LEAFY_LIKENESS)
    return shell_gain * rumble + rub_gain * rub + hiss_gain * hiss


def splinter(size=4096):
    """A short stretch of noise with the colour of breaking fibres."""
    return colour(rng.standard_normal((2, size)), CRACK_SPECTRUM, NEAR_LIKENESS)


def ringing_ticks(width_share=1.0, hold_s=0.000093, t60=0.014, ring_db=-4, ring_t60=0.023):
    """Ribs and fibres giving way, and one wooden tap: a resonant noise tick that rings for a moment."""
    out = np.zeros((2, N))
    for start_s, db, hz in RINGING_TICKS:
        tick = rms_one(resonate(splinter(), hz, width_share * hz))
        t = T[:tick.shape[1]]
        ring = from_db(ring_db) * sine(hz, t) * burst(t, 0, ring_t60)
        add(out, start_s, from_db(db) * (tick * burst(t, hold_s, t60) + ring))
    return out


def thump(hz, hold_s, t60=0.016, slosh_db=-26, slosh_t60=0.094, rise_s=0.002, low_cut_hz=220):
    """The water-filled shell swings while pushed, then faintly rings on; it is too small to radiate bass."""
    t = T[:SR // 6]
    swing = burst(t, hold_s, t60) + from_db(slosh_db) * burst(t, hold_s, slosh_t60)
    level = np.minimum(t / rise_s, 1) * swing
    low_cut = signal.butter(2, low_cut_hz, "high", fs=SR, output="sos")
    return signal.sosfilt(low_cut, -sine(hz, t) * level)


def knocks(clack_width_hz=600, clack_s=0.0008, clack_t60=0.011, ring_db=-1, ring_t60=0.038, judder_db=-11):
    """Soft contacts of blade, hand and ground: the husk clacks and judders over the shell's thump."""
    out = np.zeros((2, N))
    for start_s, clack_db, clack_hz, thump_db, shell_hz, hold_s in NUT_KNOCKS:
        rasp = rms_one(resonate(splinter(), clack_hz, clack_width_hz))
        t = T[:rasp.shape[1]]
        judder = from_db(judder_db) * burst(t, hold_s, clack_t60)
        contact = from_db(-1.5) * burst(t, clack_s, clack_t60) + judder
        ring = from_db(ring_db) * sine(clack_hz, t) * burst(t, clack_s, ring_t60)
        add(out, start_s, from_db(clack_db) * (rasp * contact + ring))
        add(out, start_s, from_db(thump_db) * thump(shell_hz, hold_s))
    return out


def squeaks(jitter_db=0.25, shimmer_db=1.5):
    """Now and then the slips lock into a pitch; returns that sound and how far they are locked, 0-1."""
    out, locked = np.zeros(N), np.zeros(N)
    jitter, shimmer = flutter(rate=340, depth_db=jitter_db), flutter(rate=210, depth_db=shimmer_db)
    for start_s, length_s, start_hz, end_hz, db in BLADE_SQUEAKS:
        span = slice(int(start_s * SR), int((start_s + length_s) * SR))
        hz = np.geomspace(start_hz, end_hz, len(T[span])) * jitter[span]
        partials_hz = np.outer(np.arange(1, 11), hz)
        phases = 2 * np.pi * np.cumsum(partials_hz, axis=1) / SR
        tone = np.sum(from_db(at_hz(SQUEAK_SPECTRUM, partials_hz)) * np.sin(phases), axis=0)
        window = signal.windows.tukey(len(hz), 0.5)
        add(out, start_s, from_db(db) * rms_one(tone) * window * shimmer[span])
        add(locked, start_s, window)
    return out * from_db([[-1.3], [1.2]]), np.minimum(locked, 1)


def blade_ring():
    """The freed blade rings in a few decaying steel modes."""
    out, t = np.zeros((2, N)), T[:SR // 3]
    for start_s, db in BLADE_RELEASES:
        add(out, start_s, sum(from_db(db + mode_db) * sine(hz, t) * burst(t, 0, t60)
                              for hz, mode_db, t60 in BLADE_MODES))
    return out


def blade_strokes():
    """Steel sticks and slips in the wet husk; the slips sound the shell, the husk and the torn fibres."""
    slips = grains(per_s=5000, spread_db=1.5) * flutter(rate=260, depth_db=2.0)
    shell = colour(slips, SHELL_SPECTRUM, NEAR_LIKENESS)
    fibres = colour(slips, FIBRE_SPECTRUM, NEAR_LIKENESS)
    drag = colour(slips, CRACK_SPECTRUM, NEAR_LIKENESS)
    husk = rms_one(sum((-1) ** k * from_db(db) * resonate(drag, hz, width_hz)
                       for k, (hz, width_hz, db) in enumerate(HUSK_MODES)))
    husk_gain, shell_gain, fibre_gain = movements(BLADE_STROKES, STROKE_ATTACK_S, STROKE_RELEASE_S)
    squeal, locked = squeaks()
    # the rough scraping gives way while a squeak holds
    body = (shell_gain * shell + husk_gain * husk) * from_db(-6 * locked)
    tearing = fibre_gain * fibres * from_db(-3 * locked)
    return squeal + body + tearing + blade_ring()


def chops(crack_t60=0.024, edge_db=-1.0, edge_t60=0.0083, husk_db=-9, husk_t60=0.027):
    """The edge bursts through skin and fibres, the husk rings, the nut thumps as the blade is stopped."""
    out = np.zeros((2, N))
    for start_s, crack_db, cut_s, thump_db, delay_s, shell_hz, hold_s in KNIFE_CHOPS:
        crack = splinter()
        t = T[:crack.shape[1]]
        tearing = burst(t, cut_s, crack_t60) + from_db(edge_db) * burst(t, 0, edge_t60)
        husk = sum((-1) ** k * from_db(db) * sine(hz, t) for k, (hz, _, db) in enumerate(HUSK_MODES))
        husk = from_db(husk_db) * husk * burst(t, 0, husk_t60)
        add(out, start_s, from_db(crack_db) * (crack * tearing + husk))
        add(out, start_s + delay_s, from_db(thump_db) * thump(shell_hz, hold_s))
    return out


def trees(x, t60, dull_hz):
    """Trunks and foliage scatter back a thin, dull tail: convolution with decaying low-passed noise."""
    t = T[:SR]
    dull = signal.butter(1, dull_hz, fs=SR, output="sos")
    echo = signal.sosfilt(dull, rng.standard_normal((2, SR)))
    echo *= burst(t, 0, t60) * np.minimum(t / 0.009, 1)  # 9 ms build-up
    echo /= np.sqrt(np.sum(echo ** 2, axis=1, keepdims=True))
    return signal.fftconvolve(x, echo, axes=1)[:, :N]


def scene():
    """Close work on the nut is almost dry; the bird is far off among the trees."""
    background = air() + dry_leaves() + right_clicks()
    song = bird()
    close = rolling() + ringing_ticks() + knocks() + blade_strokes() + chops()
    close_echo = from_db(-39) * trees(close, t60=0.97, dull_hz=4000)
    song_echo = from_db(-12.5) * trees(song, t60=0.55, dull_hz=3000)
    return background + song + close + close_echo + song_echo


def record(dry, low_cut_hz=36):
    """Deep bass is rolled off, peaks are clipped at full scale, and the top is cut steeply."""
    low_cut = signal.butter(3, low_cut_hz, "high", fs=SR, output="sos")
    clipped = np.clip(signal.sosfilt(low_cut, dry), -1, 1)
    top_cut = signal.ellip(10, 0.2, 80, CUTOFF_HZ, fs=SR, output="sos")
    return signal.sosfilt(top_cut, clipped)


dry = scene()
out = record(dry)
store_pcm(out)
```